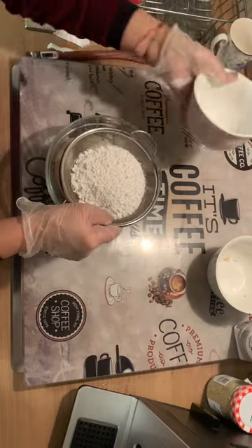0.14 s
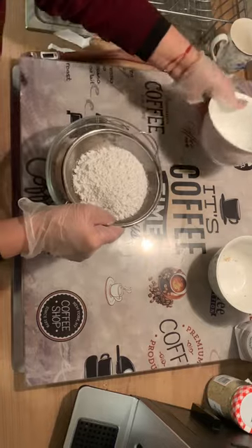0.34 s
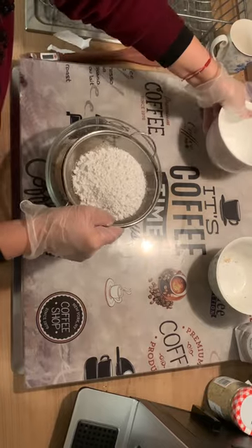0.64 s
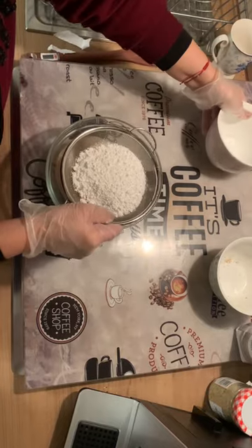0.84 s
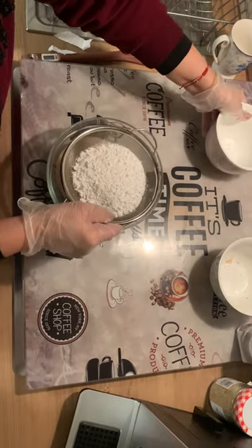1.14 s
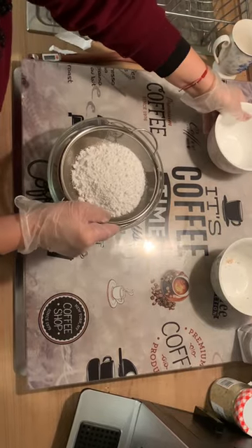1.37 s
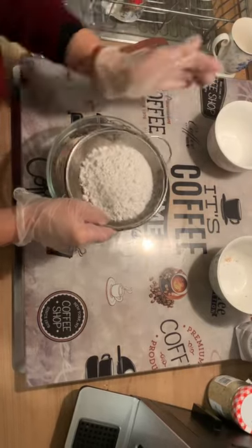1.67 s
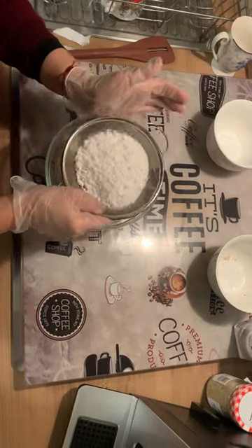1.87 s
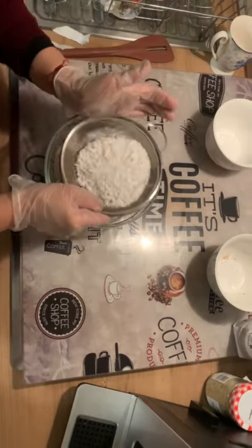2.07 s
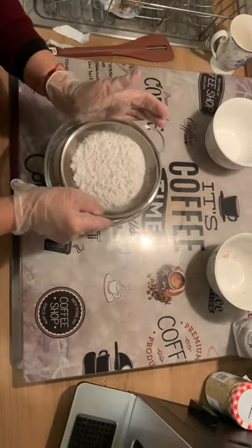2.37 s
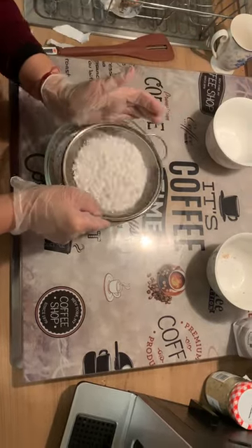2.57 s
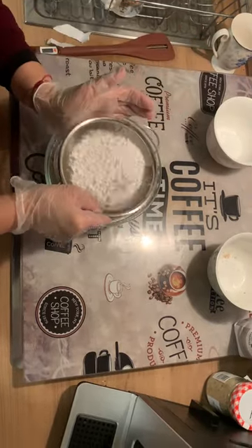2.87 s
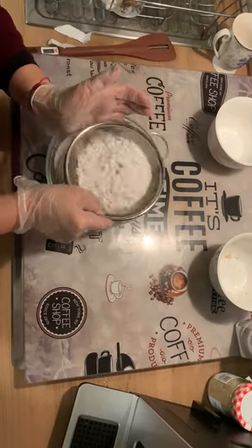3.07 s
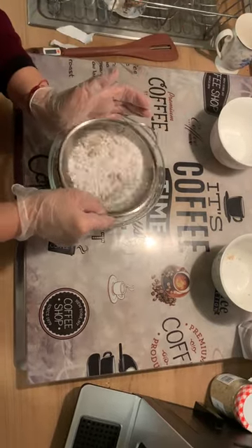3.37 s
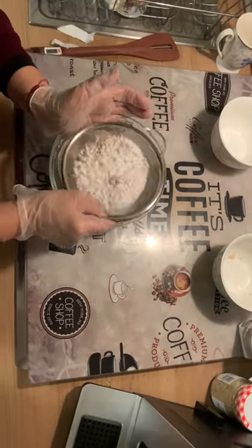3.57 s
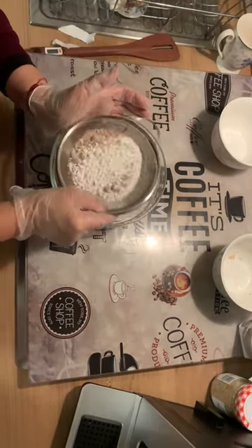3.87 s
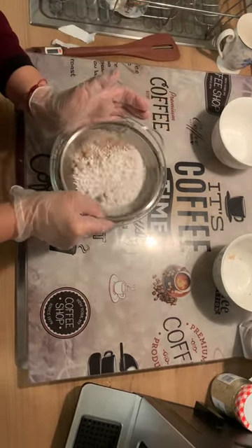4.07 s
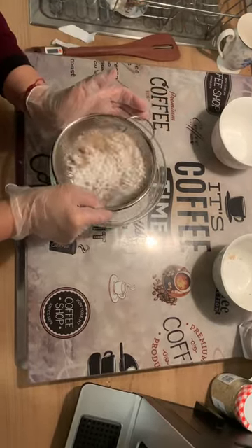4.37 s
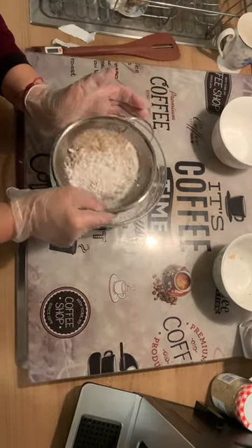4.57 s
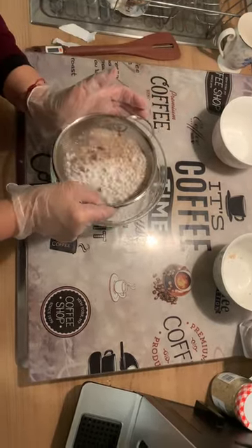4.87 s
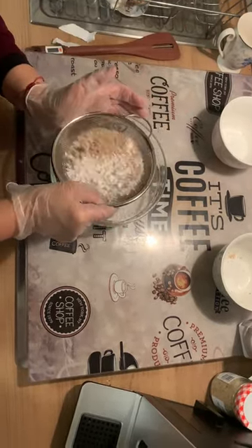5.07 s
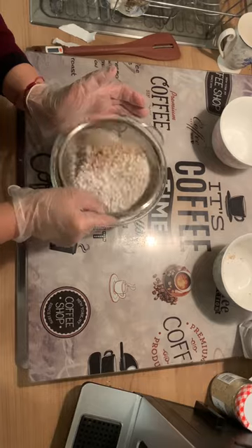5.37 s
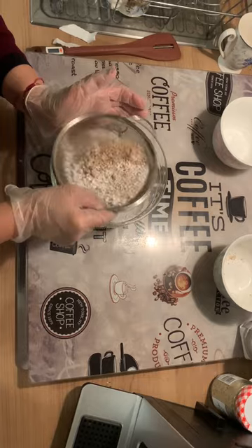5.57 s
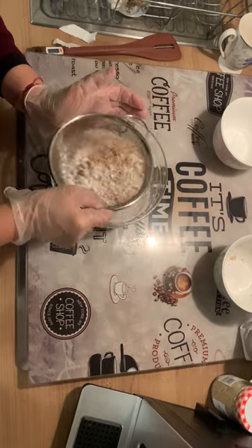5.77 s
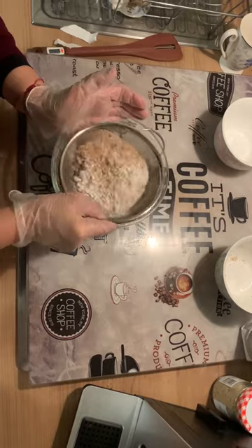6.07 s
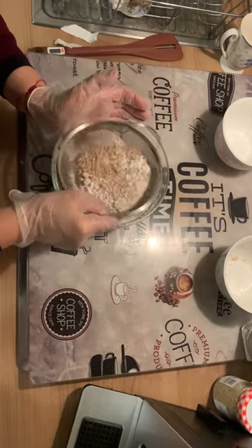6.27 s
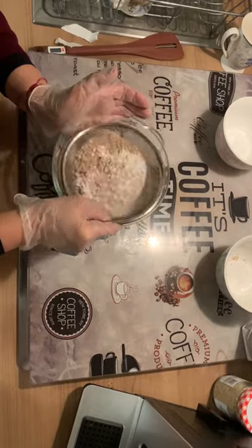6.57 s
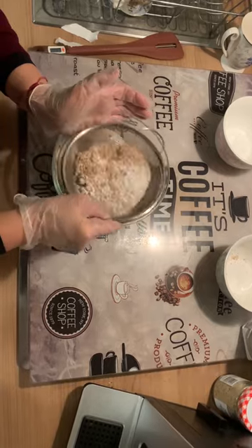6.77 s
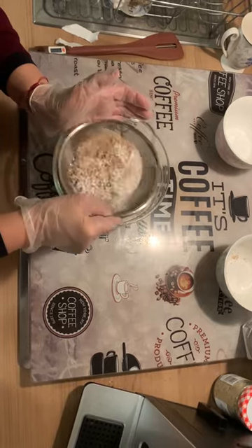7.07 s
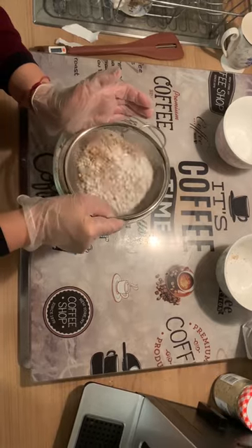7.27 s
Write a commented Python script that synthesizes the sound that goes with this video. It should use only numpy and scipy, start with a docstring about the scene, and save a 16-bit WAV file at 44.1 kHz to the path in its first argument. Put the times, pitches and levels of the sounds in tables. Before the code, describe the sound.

A quiet kitchen, heard closely in stereo, with a faint wavering low hum and a little air hiss throughout. From 0 to 0.5 s, the last powder slides out with soft, bright rustles and a faint low bump. Near-quiet follows until 1.1 s, when the edge of a cup strikes the worktop with a hard, ringing clack; at 1.35 s it lands flat, louder and heavier, with a woody thump and short ring. Slight glove scuffs and a soft low bump follow until 1.65 s. From 1.75 s to the end at about 7.5 s, a fine mesh sieve is knocked against a gloved palm nearly six times a second. Each stroke has a short powder slide, then a crisp grainy hiss with a tiny rim tick and muted thud. The strokes begin faint and sharp, growing fuller and raspier after about 4.3 s, with occasional lumps flicking the wires.

```python
"""Powder knocked through a sieve

The last powder is poured, a cup is set down on the worktop with two knocks, and then a fine mesh sieve
is knocked against a gloved palm about six times a second. Grain clicks shaped by bursts make the hiss;
resonances make the mesh, rim and cup; noise bands make the cup's crack. An appliance hums under it all.
Two close microphone ports hear every source with phase and likeness that depend on frequency."""
import sys
import numpy as np
from scipy import signal
from scipy.fft import rfft, irfft
from scipy.io import wavfile

SR = 44100
rng = np.random.default_rng(int(sys.argv[2]) if len(sys.argv) > 2 else 0)


def wav_out(sig):
    """Save sig, one row per channel (or a flat mono array), as 16-bit PCM at SR to the path in sys.argv[1]."""
    wavfile.write(sys.argv[1], SR, np.round(np.clip(np.atleast_2d(sig).T, -1, 1) * 32767).astype(np.int16))


N = 328104
T = np.arange(N) / SR
HZ = np.fft.rfftfreq(N, 1 / SR) + 1   # offset keeps the logarithm finite


def amp(db):
    """Decibels to gain."""
    return 10 ** (np.asarray(db) / 20)


def rms_one(x):
    """Scale to rms 1."""
    return x / np.sqrt(np.mean(x ** 2) + 1e-20)


def at_hz(points, hz, axis=1):
    """Read a table column on a log-frequency axis."""
    points = np.array(points)
    return np.interp(np.log(hz), np.log(points[:, 0]), points[:, axis])


def coloured(x, spectrum):
    """Give a noise a spectrum; rms 1."""
    return rms_one(irfft(rfft(x) * amp(at_hz(spectrum, HZ)), N))


def bandpass(x, low_hz, high_hz):
    """Keep one band."""
    return signal.sosfilt(signal.butter(2, [low_hz, high_hz], "band", fs=SR, output="sos"), x)


def resonate(x, hz, width_hz):
    """One two-pole resonance with gain 1 on top."""
    r = np.exp(-np.pi * width_hz / SR)
    zeros = np.array([1, 0, -1]) * (1 - r * r) / 2
    return signal.lfilter(zeros, [1, -2 * r * np.cos(2 * np.pi * hz / SR), r * r], x)


def flicker(rate_hz, depth_db):
    """Uneven gain: low-passed noise as decibels, with an rms of depth_db."""
    r = np.exp(-2 * np.pi * rate_hz / SR)
    return amp(depth_db * rms_one(signal.lfilter([1], [1, -2 * r, r * r], rng.standard_normal(N))))


def body(x, modes, shift_db):
    """Parallel resonances, signs alternating, whose balance keeps shifting; rms 1."""
    total = 0
    for k, (hz, width_hz, db) in enumerate(modes):
        total = total + (-1) ** k * amp(db) * flicker(11, shift_db) * resonate(x, hz, width_hz)
    return rms_one(total)


def swell(s, rise_s, t60_s, lead_s=0.0016):
    """Slice and shape of a burst that creeps in over lead_s, swells from s and dies; top 1."""
    start = round(s * SR) - SR // 20
    t = T[:min(N - start, SR // 2)] - 1 / 20
    after = np.maximum(t, 0)
    creep = 0.19 * np.exp(np.minimum(t, 0) / max(lead_s, 1e-4))
    rise = (1 - np.exp(-after / max(rise_s, 1e-4))) ** 2
    shape = (creep + rise) * amp(-60 * after / max(t60_s, .005))
    return slice(start, start + len(t)), shape / shape.max()


def grains(per_s, spread_db):
    """Dense clicks of uneven size and random sign, two unrelated draws."""
    sizes = amp(spread_db * np.minimum(rng.exponential(1, (2, N)), 5)) * rng.choice([-1, 1], (2, N))
    return sizes * (rng.random((2, N)) < per_s / SR)


# Wavering hum. Each row: centre in Hz, width in Hz, level in dB.
HUM_BANDS = [(42.7, 13.3, -60.5), (105.05, 36, -65), (78.22, 55, -60.5), (129, 17, -72.5)]
# Steady lines of the hum. Each row: frequency in Hz, level in dB.
HUM_LINES = [(41.5, -60.5), (100.0, -53.5)]
# Room air and microphone hiss. Each row: frequency in Hz, relative level in dB.
AIR_SPECTRUM = [(200, -18.5), (350, -20.5), (600, -22.5), (900, -26), (1300, -31.5), (2800, -29.5),
                (4000, -28), (5300, -29.5), (6800, -33.5), (8500, -32.5), (11000, -31.5), (13500, -32),
                (16000, -38.5)]
AIR_DB, HUM_WAVER_DB = -66.5, 1.0


def kitchen():
    """Wavering hum, from lines and noise in narrow resonances, over steady air."""
    air = coloured(rng.standard_normal((2, N)), [(90, -28.0)] + list(AIR_SPECTRUM))
    out = amp(AIR_DB) * air
    waver = flicker(16, HUM_WAVER_DB)
    for hz, width_hz, level_db in HUM_BANDS:
        narrow = resonate(rng.standard_normal((2, N)), hz, width_hz)
        out += amp(level_db) * waver * rms_one(resonate(narrow, hz, width_hz))
    out[0] += waver * sum(amp(db) * np.sin(2 * np.pi * hz * T) for hz, db in HUM_LINES)
    return out


# Powder poured, brief noise rising into the first knock (rows at 1.099 and 1.104 s), then glove and cup
# brushing the worktop. Each row: top in seconds, hiss in dB, body in dB over the hiss,
# 20 dB rise in seconds, 20 dB fall in seconds.
RUSTLES = [(.015, -51, -16, .08, .13), (.075, -63, -4, .05, .05), (.15, -60, -10, .15, .2),
           (.24, -50, -15, .11, .095), (.376, -54.5, -5, .05, .06), (1.099, -62, 14, .01, .02),
           (1.104, -53, 14, .014, .05), (1.345, -58, 13, .075, .17), (1.47, -55, 2, .04, .08),
           (1.574, -61.5, -3.5, .05, .09)]


def rustles():
    """Power of the hiss and of the duller body noise: each swells and falls evenly in dB."""
    hiss, rub = np.zeros((2, N))
    for s, hiss_db, body_db, rise_s, fall_s in RUSTLES:
        slope_s = np.maximum(np.where(T < s, rise_s, fall_s), 1e-3)
        level_db = hiss_db - 20 * np.abs(T - s) / slope_s
        hiss += amp(2 * level_db)
        rub += amp(2 * (level_db + body_db))
    return hiss, rub


# Body noise of the rustles. Each row: frequency in Hz, relative level in dB.
SCUFF_SPECTRUM = [(400, -9.5), (800, -2), (1200, -3), (1600, 2), (2200, -1), (3500, -0.5), (4400, -6),
                  (4900, -23)]


def scuff(rub, rasp):
    """Body of the rustles: flickering grain noise, mostly mid frequencies."""
    return np.sqrt(rub) * flicker(40, 3.0) * coloured(rasp, SCUFF_SPECTRUM)


# Single lumps on the mesh wires. Each row: time in seconds, level in dB before the crest is taken off.
FLICKS = [(0.1052, -46.5), (2.5466, -49), (2.947, -48), (3.9499, -41.5), (4.2926, -49), (4.488, -38.5),
          (4.655, -39.5), (4.8442, -44), (5.0186, -43.5), (5.361, -46), (5.5406, -50), (5.798, -44),
          (5.8985, -53), (6.0785, -45), (6.4416, -39), (6.61, -46), (6.78, -50), (7.0842, -46.5),
          (7.1267, -41)]
FLICK_T60_S, FLICK_CREST_DB = 0.037, 7   # crest: peak over rms


def flicks():
    """Power of the brief hiss as single lumps flick the wires."""
    hiss = np.zeros(N)
    for s, peak_db in FLICKS:
        at, shape = swell(s, 0.00081, FLICK_T60_S)
        hiss[at] += amp(2 * (peak_db - FLICK_CREST_DB)) * shape ** 2
    return hiss


def patchy(x, fast_db, slow_db):
    """Third-octave bands of the hiss flicker independently at random."""
    edges_hz = 1500 * 2 ** (np.arange(12) / 3)
    total = 0
    for k, (low, high) in enumerate(zip(edges_hz, edges_hz[1:])):
        band = (-1) ** k * bandpass(x, low, high)
        total = total + band * flicker(50, fast_db) * flicker(8.3, slow_db)
    return total


def lumps(per_s, cycles):
    """Coarser lumps tick on the wires, each ringing a few cycles at one of 14 pitches."""
    clicks = grains(per_s, spread_db=0.0)[0]
    dealt = rng.integers(0, 14, N)
    total = 0
    for k, hz in enumerate(np.geomspace(2200, 9500, 14)):
        total = total + resonate(clicks * (dealt == k) + 1e-18, hz, hz / cycles)
    return rms_one(total)


# Powder on the mesh. Each row: frequency in Hz, relative level in dB.
POWDER_SPECTRUM = [(2200, -15), (2800, -10.5), (4000, -13), (5300, -1.5), (6200, -0.5), (6900, 3),
                   (7600, -4), (8500, -6.5), (9700, -10.5), (11000, -7.5), (13500, -18.5), (15900, -24)]


def powder(rasp):
    """Flickering rasp of grains on the mesh, with coarser lumps on top."""
    out = flicker(90, 0.94) * coloured(patchy(rasp, fast_db=2.0, slow_db=1.5), POWDER_SPECTRUM)
    out[0] += amp(-15.5) * flicker(30, 5.5) * lumps(per_s=900, cycles=18.0)
    return out


# Soft pushes on the worktop. Each row: time in seconds, level in dB, frequency in Hz.
BUMPS = [(0.292, -38.5, 85.7), (0.808, -50, 54.3), (1.06, -34.5, 66.4), (1.292, -37.5, 70),
         (1.625, -28, 68.7), (1.778, -39.5, 91.2), (2.105, -43, 77), (2.289, -41, 116.7),
         (2.397, -41.5, 56), (2.971, -45, 98.7), (3.143, -42.5, 98.8), (4.187, -46, 94), (5.6, -48, 96.7),
         (6.129, -49, 109), (6.305, -49, 90.8), (7.371, -50, 99)]
BUMP_T60_S = 0.16


def bumps():
    """The worktop is pushed softly and swings a few cycles."""
    out = np.zeros(N)
    for s, peak_db, hz in BUMPS:
        at, shape = swell(s, 0.0052, BUMP_T60_S)
        out[at] += amp(peak_db) * shape * np.sin(2 * np.pi * hz * T[:len(shape)])
    return out


# Contacts of the cup. Each row: time in seconds, level in dB, landing from 0 (edge first) to 1 (flat),
# dull above Hz, thin below Hz.
KNOCKS = [(1.1081, -16.5, 0, 8000, 900), (1.1156, -24.5, 0.075, 3000, 180), (1.1216, -20.5, 0.15, 900, 42),
          (1.3442, -36.5, 0.6, 8150, 380), (1.3473, -10, 0.91, 8000, 340), (1.3536, -21.5, 0.29, 3000, 130),
          (1.365, -7.5, 0.84, 350, 34)]
# Modes of cup and worktop. Each row: frequency in Hz, t60 in seconds, dB on the edge, dB on landing.
CUP_MODES = [(59.6, 0.22, -23, -4), (102.5, .38, -27, -11), (134.24, 0.18, -23, -5.5),
             (165.2, .2, -23.5, -8), (200, .25, -16.5, -21), (243, 0.19, -15, -12),
             (302, 0.29, -18.5, -15.5), (323.1, .25, -7.5, -16.5), (408.5, 0.22, -4, -10),
             (424, .15, -14, -11.5), (472, .25, -21, -24), (566.5, 0.1, -20.5, -24),
             (688.6, 0.26, -25, -23), (545, 0.053, -11.5, -13.5), (602, 0.2, -6, -1.5),
             (635.7, 0.14, -17, -9.5), (739, 0.14, -9.5, -14.5), (861, 0.48, -24, -27.5),
             (913.7, .13, -15.5, -12), (993, 0.32, -19, -22.5), (1078, 0.067, -12, -15),
             (1117, 0.049, -15.5, 11.5), (1343, 0.2275, -20.5, -18.5), (1374, .5, -31.5, -32),
             (1480.3, 0.23, -17, -21), (1506, 0.13, -5.5, -19.5), (1680, 0.19, -15.5, -19),
             (1763, 0.065, -0.5, -14.5), (1919, 0.037, 4.5, 2), (2007, 0.13, -20.5, -23),
             (2084, 0.18, -21, -26.5), (2475, .22, -17, -28.5), (3050, 0.24, -29, -30),
             (3347, .18, -21.5, -33.5), (2265.3, .09, -12, -16), (2239, 0.06, -7, -22),
             (2400, .09, -16, -18.5), (2940, .1, -1.5, -13.5), (3300, 0.15, -19, -24.5),
             (3480, .12, -19.5, -26.5), (3970, .08, -15.5, -20.5), (4171, .08, -19.5, -12.5),
             (4630, .1, -20.5, -22.5), (5545, 0.076, -2, -23), (6770, 0.037, -9, -17.5),
             (6930, .06, -9, -28.5), (7810, 0.015, -11, -27)]
BITE_EDGE_S, BITE_LANDING_S = 0.00057, 0.0014   # build-up of a contact
BUILD_CYCLES = .35   # build-up of a mode
CUP_APART = .35   # share of a mode that differs between the ports
CUP_WAVER_DB, CUP_WAVER_HZ, CUP_WAVER_S, STEADY_BELOW_HZ = 3.0, 30, .03, 500


def cup_ring():
    """Contacts ring the modes; a random waver roughens all but the low ones."""
    out, t = np.zeros((2, N)), T[:SR // 2]
    signs = rng.choice([-1, 1], len(CUP_MODES))   # of the quarter-cycle part that differs between the ports
    wavers = [flicker(CUP_WAVER_HZ, CUP_WAVER_DB) for _ in range(7)]
    for s, peak_db, landing, dull_hz, thin_hz in KNOCKS:
        at = slice(round(s * SR), round(s * SR) + len(t))
        bite_s = np.interp(landing, [0, 1], [BITE_EDGE_S, BITE_LANDING_S])
        bite = 1 - np.exp(-t / bite_s)
        for (hz, t60_s, *level_db), sign, waver in zip(CUP_MODES, signs, wavers * len(CUP_MODES)):
            mode_db = peak_db + np.interp(landing, [0, 1], level_db)
            tone = amp(mode_db - 60 * t / t60_s) * bite
            tone *= 1 - np.exp(-t * hz / BUILD_CYCLES)
            waver_share = np.minimum(t / CUP_WAVER_S, 1) / (1 + (STEADY_BELOW_HZ / hz) ** 4)
            tone *= waver[at] ** waver_share
            tone /= (1 + (hz / dull_hz) ** 2) * (1 + (thin_hz / hz) ** 2)
            out[0, at] += tone * np.sin(2 * np.pi * hz * t)
            out[1, at] += CUP_APART * sign * tone * np.cos(2 * np.pi * hz * t)
    return out


# Crack and its dying in the kitchen. Each row: frequency in Hz, relative level in dB, t60 in seconds.
CRACK_BANDS = [(150, -5.5, 0.42), (355, -3, 0.28), (693.6, 5, 0.22), (1280, -13.5, 0.33),
               (1948, -7.5, 0.18), (2740, -9, 0.26), (4035, -12.5, 0.22), (6400, -18, 0.086),
               (10352, -29.5, 0.04), (11770, -46, .04), (14660, -51, 0.052)]
CRACK_EDGE_DB, CRACK_LANDING_DB = -13.5, -10
LEAD_EDGE_S, LEAD_LANDING_S = 0.0024, 0.0029   # short fade-in of the crack noise
SNAP_DB, SNAP_T60_S = 5, 0.032   # first instant of the crack, added to its tail


def cup_crack():
    """A noise burst at the first edge and flat contacts, dying band by band."""
    out = np.zeros((2, N))
    edges_hz = 110 * 2 ** np.arange(0, 7.6, .5)
    cracks = [(KNOCKS[0][0], CRACK_EDGE_DB, LEAD_EDGE_S), (KNOCKS[4][0], CRACK_LANDING_DB, LEAD_LANDING_S)]
    for s, crack_db, lead_s in cracks:
        snap = amp(SNAP_DB) * swell(s, 0.0014, SNAP_T60_S, lead_s=0.0024)[1]
        for low, high in zip(edges_hz, edges_hz[1:]):
            hz = np.sqrt(low * high)
            at, shape = swell(s, 0.0005, at_hz(CRACK_BANDS, hz, axis=2), lead_s)
            noise = bandpass(rng.standard_normal((2, len(shape))) * (shape + snap), low, high)
            out[:, at] += amp(crack_db + at_hz(CRACK_BANDS, hz)) * noise
    return out


# Strokes: powder slides off, then the rim meets the palm. Each row: blow in seconds, blow hiss in dB,
# sharp tick in dB over the hiss, thud in dB, mesh drum in dB over the hiss, slide lead in seconds,
# slide hiss in dB, slide t60 in seconds, blow hiss t60 in seconds.
STROKES = [(1.753, -52.5, 4, -48.5, -37, 0.039, -80, 0.23, 0.14),
           (1.924, -58.5, 9, -87, -39, 0.044, -66, .2, 0.16),
           (2.101, -52, 10.5, -60, -12.5, 0.033, -58.5, 0.17, 0.15),
           (2.2815, -51.5, 5, -54, -6.5, 0.039, -59, 0.25, 0.15),
           (2.461, -49, 7, -59, -38, 0.04, -57, .2, 0.13),
           (2.6295, -51.5, 9.5, -54, -15.5, 0.042, -59.5, 0.18, 0.13),
           (2.81, -50, 8, -55.5, -16.5, 0.039, -52.5, 0.19, 0.11),
           (2.972, -48.5, 4, -52.5, -14.5, 0.031, -59, 0.14, 0.14),
           (3.138, -49, 9, -54.5, -9.5, .042, -59.5, 0.21, 0.13),
           (3.319, -54, 8.5, -62, -14, 0.05, -53, 0.28, 0.16),
           (3.48, -49, 0, -58.5, -17.5, 0.057, -56, 0.22, 0.2),
           (3.6506, -49, 1, -59, -16, 0.051, -60, .2, 0.15),
           (3.819, -50.5, 7, -60, -15, 0.043, -55, 0.25, 0.17),
           (3.9887, -51.5, 10, -57, -11, 0.045, -51.5, 0.2, 0.18),
           (4.169, -48.5, 9.5, -67, -17, 0.055, -52, 0.4, 0.12),
           (4.3454, -47, 6.5, -53, -14, 0.043, -45.5, 0.14, 0.21),
           (4.52, -48, -1, -62.5, -13.5, 0.049, -51.5, .18, 0.2),
           (4.7039, -44.5, 0, -58, -13, 0.057, -50.5, 0.23, 0.19),
           (4.8808, -48.5, 4, -58, -16.5, 0.042, -48.5, 0.19, 0.2),
           (5.052, -46.5, 2, -54.5, -16, 0.037, -51.5, 0.16, 0.22),
           (5.2296, -46, 0, -53, -14.5, 0.051, -48, 0.2, 0.14),
           (5.4082, -45.5, 2.5, -76, -13.5, 0.048, -48.5, 0.2, 0.12),
           (5.584, -46, -1.5, -54.5, -18, 0.041, -46.5, 0.21, 0.16),
           (5.7758, -46, 4, -56.5, -11.5, 0.059, -50.5, 0.17, .18),
           (5.9504, -48, 6.5, -54, -14.5, 0.053, -48, 0.24, 0.2),
           (6.12, -45.5, 7.5, -54, -16, 0.036, -49, 0.17, 0.12),
           (6.298, -44, -1, -55, -16.5, 0.047, -49, 0.35, 0.12),
           (6.476, -44, -2, -54.5, -12, 0.039, -50.5, 0.24, 0.11),
           (6.6485, -46, 2, -57, -16.5, 0.045, -49.5, 0.22, 0.14),
           (6.816, -46, 1, -56.5, -15, 0.03, -46, 0.26, 0.16),
           (6.9928, -49, 10.5, -56, -15, 0.034, -48, 0.17, 0.19),
           (7.154, -47.5, -0.5, -81, -16, 0.031, -56, 0.13, 0.26),
           (7.329, -46, 3.5, -54.5, -19, 0.035, -53.5, 0.15, 0.18)]
HIT_RISE_S, SLIDE_RISE_S = 0.014, 0.022
SLIDE_TICK_DB, SLIDE_TICK_SPREAD_DB = -23, 2.5   # tick over the slide's hiss
SLIDE_DRUM_DB = -1.5   # over the blow's drum share


def jolts():
    """Two jolts a stroke, slide and blow: (s, hiss dB, tick dB, drum dB, rise s, t60 s)."""
    for s, hiss_db, tick_db, _, drum_db, early_s, slide_db, slide_t60_s, hit_t60_s in STROKES:
        slide_tick_db = SLIDE_TICK_DB + SLIDE_TICK_SPREAD_DB * rng.standard_normal()
        yield s - early_s, slide_db, slide_tick_db, drum_db + SLIDE_DRUM_DB, SLIDE_RISE_S, slide_t60_s
        yield s, hiss_db, tick_db, drum_db, HIT_RISE_S, hit_t60_s


# Rim pings at each sharp tick. Each row: frequency in Hz, width in Hz, relative level in dB.
PINGS = [(2660, 280, -37), (3290, 67, -16), (3960, 1100, -16.5)]
TICK_RISE_S, TICK_T60_S, TICK_LEAD_S = .0012, .03, .0035
RISE_SPREAD, PING_SPREAD_DB = .35, 3   # from jolt to jolt; rise spread in natural log units


def jolt_powers():
    """Power of hiss, mesh drum and rim pings that the jolts throw up."""
    hiss, drum = np.zeros((2, N))
    ping = np.zeros((len(PINGS), N))
    for s, hiss_db, tick_db, drum_db, rise_s, t60_s in jolts():
        at, shape = swell(s, rise_s * np.exp(RISE_SPREAD * rng.standard_normal()), t60_s, lead_s=0.009)
        tick = swell(s, TICK_RISE_S, TICK_T60_S, TICK_LEAD_S)[1]
        hiss[at] += amp(2 * hiss_db) * (shape ** 2 + (amp(tick_db) * tick) ** 2)
        ping_db = hiss_db + tick_db + PING_SPREAD_DB * rng.standard_normal((len(PINGS), 1))
        ping[:, at] += (amp(ping_db) * tick) ** 2
        drum[at] += amp(2 * (hiss_db + drum_db)) * shape ** 2
    return hiss, drum, ping


def rim_pings(ping, rasp):
    """Ticks of grain noise excite the rim's high resonances."""
    out = 0
    for power, (hz, width_hz, db) in zip(ping, PINGS):
        struck = resonate(np.sqrt(power) * rms_one(rasp), hz, width_hz)
        out = out + amp(db) * np.sqrt(SR / width_hz) * struck   # narrow bands pass less noise
    return out


# Loaded mesh as a drum. Each row: frequency in Hz, width in Hz, relative level in dB.
MESH_MODES = [(1285, 170, 13.5), (1824, 1700, -8.5), (4030, 60, 7)]


def mesh_drum(drum, rasp):
    """The loaded mesh resonates under the grains."""
    return np.sqrt(drum) * flicker(35, 2.5) * body(rasp, MESH_MODES, shift_db=1.5)


# Rim on the palm. Each row: frequency in Hz, width in Hz, relative level in dB.
RIM_MODES = [(133, 22.3, 8.5), (258, 120, 1.5), (385, 150, -1.5), (641, 48, 3.5), (763, 22, 3.5)]
# Further thuds: a late one after the first blow, the rest between blows. Each row: time in seconds, level in
# dB.
EXTRA_THUDS = [(1.77, -59.5), (2.407, -56), (3.447, -65), (3.948, -60), (5.915, -57.5), (6.868, -64)]
THUD_LAG_S, THUD_T60_S = 0.0091, 0.093   # the rim thuds just after the blow


def rim_thuds():
    """Noise through the low resonances of the rim on the palm."""
    power = np.zeros(N)
    blows = [(row[0] + THUD_LAG_S, row[3]) for row in STROKES]
    for s, thud_db in blows + list(EXTRA_THUDS):
        at, shape = swell(s, 0.005, THUD_T60_S, lead_s=0.023)
        power[at] += amp(2 * thud_db) * shape ** 2
    return np.sqrt(power) * body(rng.standard_normal((2, N)), RIM_MODES, shift_db=2.5)


# Powder falling between strokes. Each row: time in seconds, level in dB.
TRICKLE = [(1.6, -74.5), (2.5, -66), (4.5, -73), (6.7, -61.5), (7.44, -63)]


def sieve():
    """Powers of all hisses add up on one grain noise; rubbing, drum, pings and thuds join it."""
    rasp = grains(per_s=15000, spread_db=1.5)
    rustle_hiss, rub = rustles()
    jolt_hiss, drum, ping = jolt_powers()
    trickle_hiss = amp(2 * np.interp(T, *np.transpose(TRICKLE), left=-120))
    hiss = rustle_hiss + flicks() + jolt_hiss + trickle_hiss
    out = np.sqrt(hiss) * powder(rasp) + scuff(rub, rasp)
    return out + mesh_drum(drum, rasp) + rim_pings(ping, rasp) + rim_thuds()


# Port pair. Each row: frequency in Hz, right port's phase lead in rad for the sieve, for the room,
# for the cup, likeness from 0 to 1.
PORTS = [(0, 0, 0, 0, 1), (60, .3, .35, .2, .98), (150, .5, .6, .4, .95), (390, .9, 1.2, .8, .6),
         (600, 2.3, 2.5, 1.9, .7), (780, 3, 3.5, 2.4, .65), (950, 3.7, 4, 4.5, .5), (1150, 5.6, 5, 5.2, .6),
         (1550, 5.8, 5, 5.2, .55), (1800, 5.9, 5.5, 6.8, .65), (2000, 6.2, 5.5, 6.2, .65),
         (2250, 4.4, 4.4, 4, .45), (2600, 3.2, 3.2, 3.1, .65), (3270, 3, 3.2, 3, .75),
         (4130, 4.4, 4.2, 4.2, .75), (4700, 3.3, 3.3, 3.3, .95), (4950, 3.14, 3.14, 3.14, .985),
         (5200, 2.9, 3.0, 3.0, .95), (7500, .7, .7, .7, .93), (7750, 0, 0, 0, 1), (8900, 0, 0, 0, 1),
         (10300, -1.5, -1.5, -1.5, .86), (11600, -2.8, -2.8, -2.8, .9), (11800, -3.14, -3.14, -3.14, 1),
         (13050, -3.14, -3.14, -3.14, 1), (13300, -3.4, -3.8, -3.3, .8), (14400, -4, -2, -4.5, 0.5),
         (15250, -6, -8.5, -7.5, 1)]
# Balance of the ports. Each row: frequency in Hz, left minus right in dB.
LEAN = [(300, 0.5), (900, -0.5), (2200, -2.5), (3200, -1.5), (4000, 0.5), (5500, 1)]


def ports(sound, axis):
    """Row 0 is common to both ports, row 1 tells them apart; the right port is shifted in phase."""
    table = np.transpose(PORTS)
    alike = np.clip(np.interp(HZ, table[0], table[4]), 0, 1)
    common, apart = rfft(sound) * np.sqrt([(1 + alike) / 2, (1 - alike) / 2])
    turn = np.exp(.5j * np.interp(HZ, table[0], table[axis]))
    lean = amp(at_hz(LEAN, HZ) / 2)
    return irfft([(common + apart) / turn * lean, (common - apart) * turn / lean], N)


def scene():
    """Near sounds and the room, through the port pair; the cup stands to the right."""
    room = ports(kitchen(), axis=2)
    near = ports(sieve() + bumps() * [[1], [0]], axis=1)
    cup = ports(cup_ring() + cup_crack(), axis=3) * amp([[-1.2], [1.2]])
    return room + near + cup


def record(dry):
    """The deepest bass is lost, peaks stop at full scale, the top is cut at 16 kHz."""
    dry = signal.sosfilt(signal.butter(4, 31, "high", fs=SR, output="sos"), dry)
    top_cut = signal.cheby2(20, 60, 16000, fs=SR, output="sos")
    return signal.sosfilt(top_cut, np.clip(dry, -1, 1))


dry = scene()
out = record(dry)
wav_out(out)
```